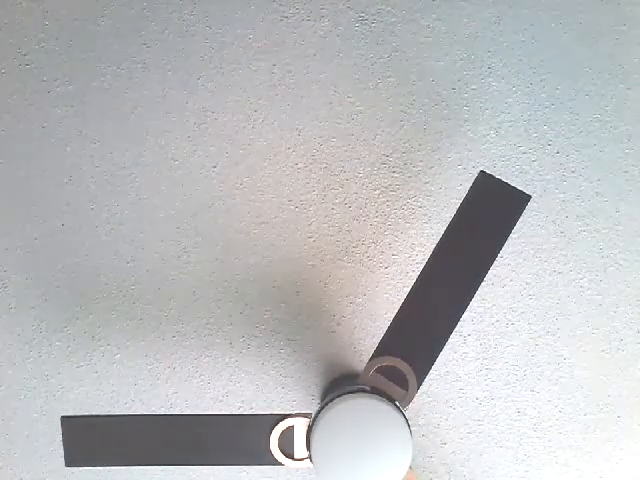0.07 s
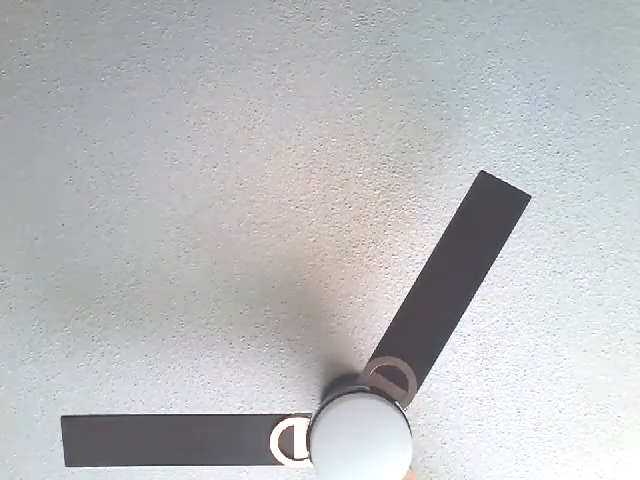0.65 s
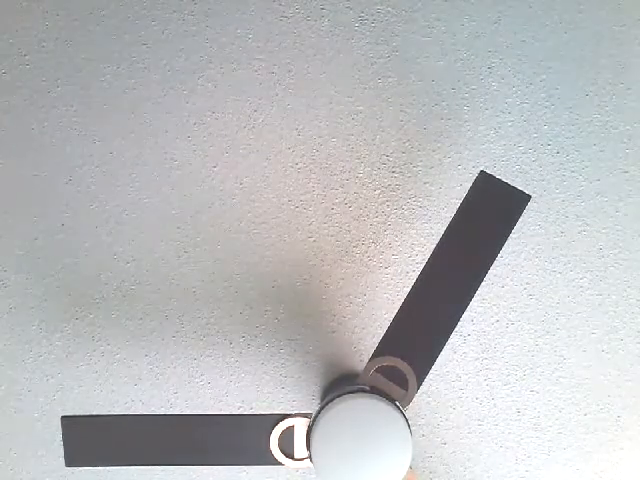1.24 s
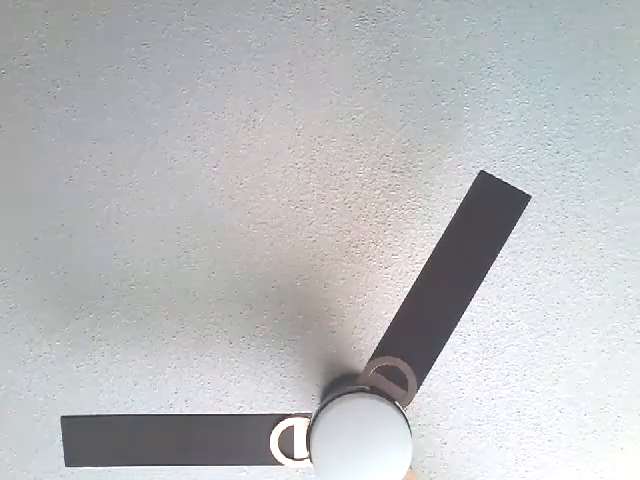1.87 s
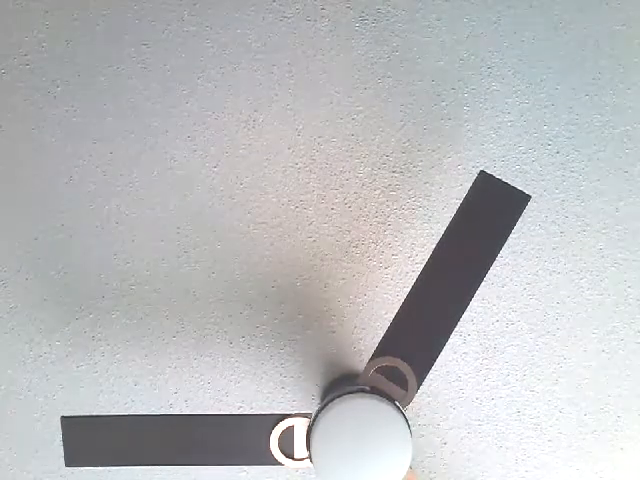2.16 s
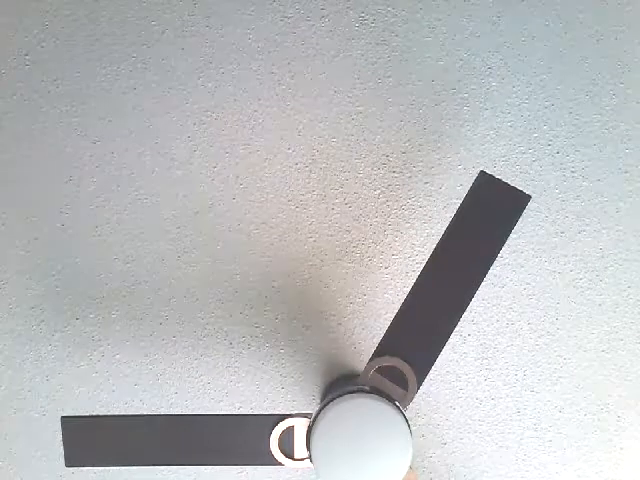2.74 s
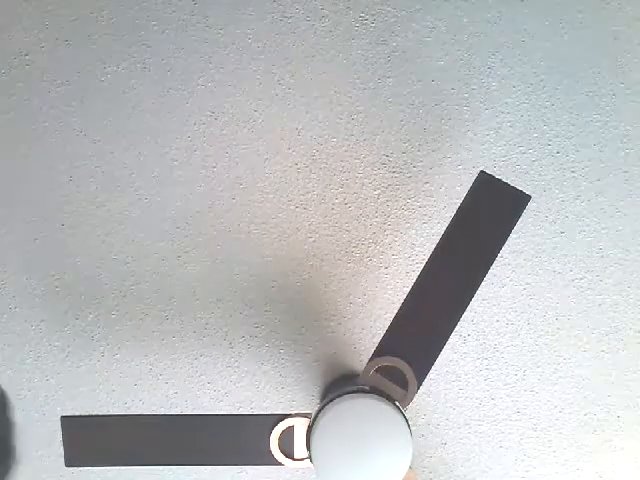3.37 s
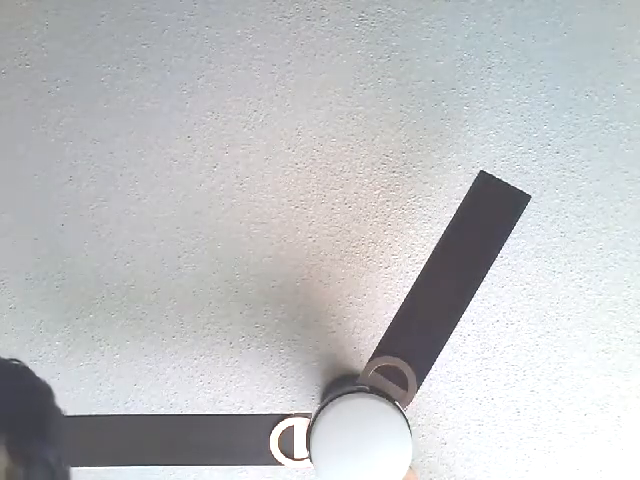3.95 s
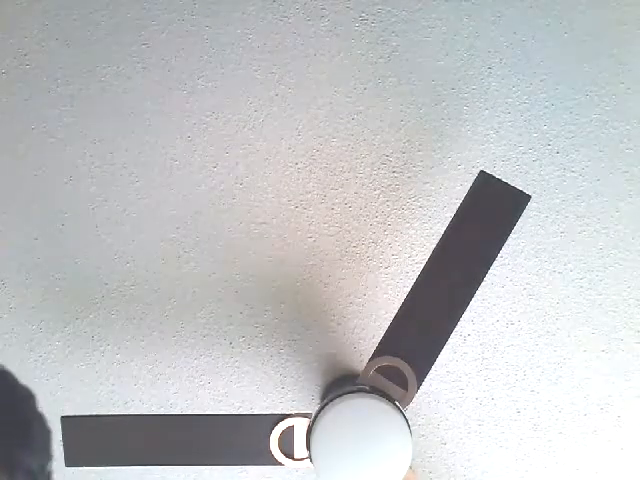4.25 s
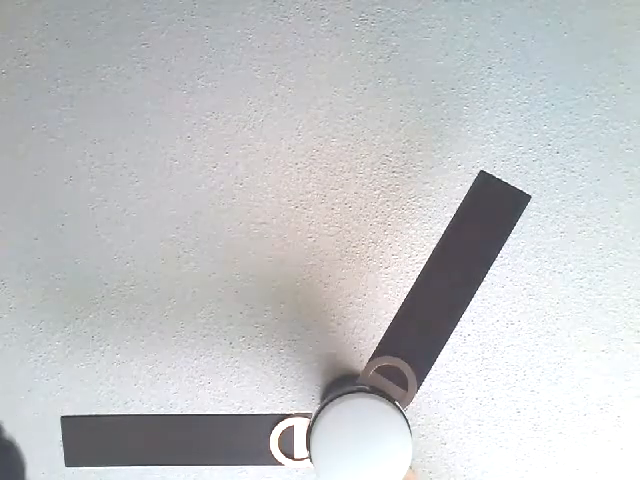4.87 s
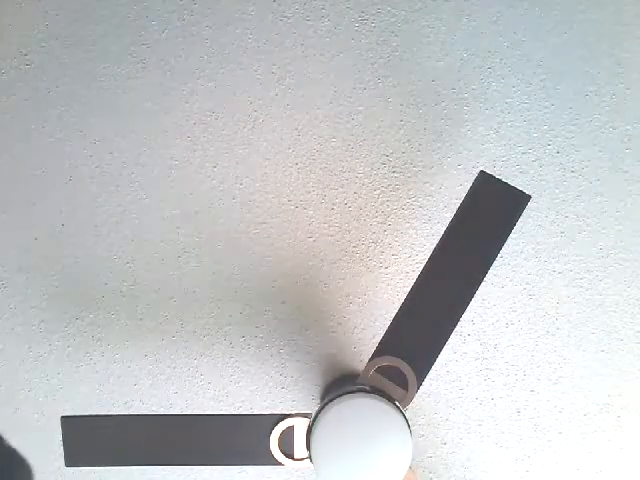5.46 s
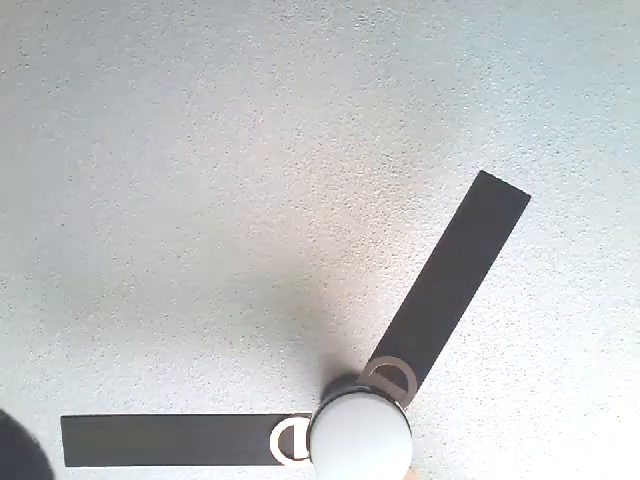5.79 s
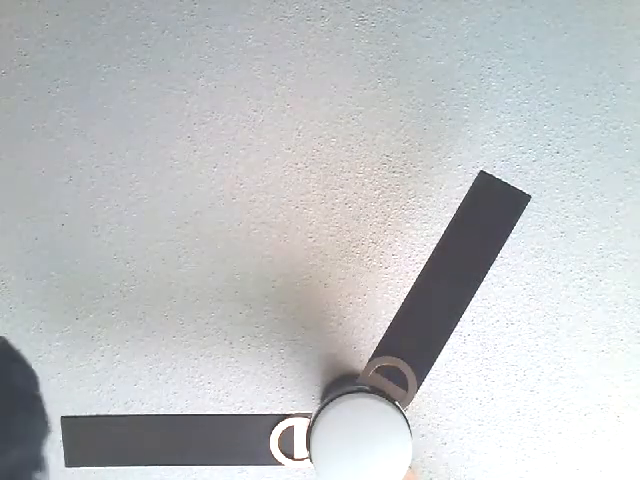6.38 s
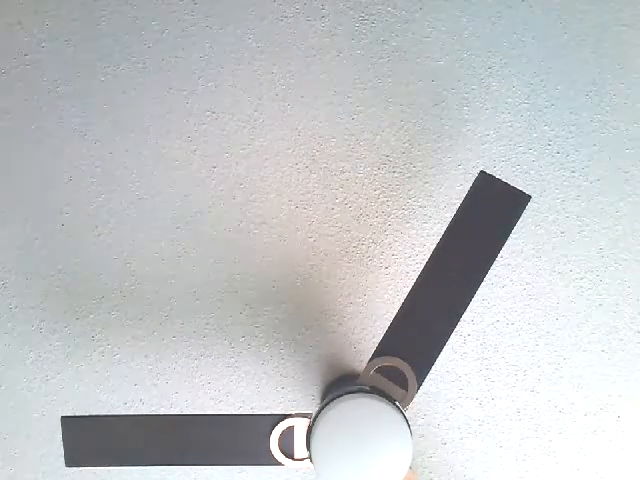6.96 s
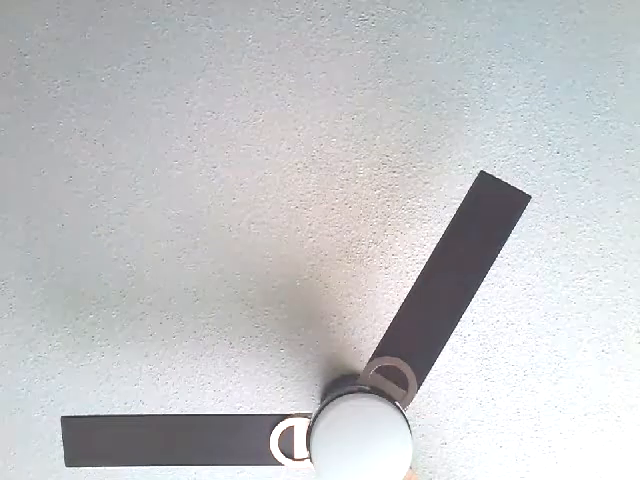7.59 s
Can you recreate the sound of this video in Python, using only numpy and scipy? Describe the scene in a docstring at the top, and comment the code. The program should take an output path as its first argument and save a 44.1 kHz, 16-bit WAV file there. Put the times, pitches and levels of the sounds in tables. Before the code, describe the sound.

Someone moves about near the microphone, shifting things with a run of clicks, dull bumps and swishing cloth. Wood then ticks and creaks softly under weight. A few clunks lead to a sharp bang, like a wooden door closing, and the snap of its latch, both ringing briefly in the small room. Light rustles and taps finish, with faint hiss and electrical hum underneath.

```python
"""A small hard-walled room: someone moves about close to the microphone, shifting things.
Fabric rustles as fibres catch and let go, and briefly whistles. Objects bump, click and knock;
wood ticks and creaks under weight. Each contact is a short pulse or a set of ringing modes.
Then a wooden panel, probably a door, clunks, bangs into its frame, and its catch snaps home.
Faint hiss and mains hum lie underneath."""
import sys
import numpy as np
from scipy import signal
from scipy.fft import rfft, irfft
from scipy.io import wavfile

SR = 44100
rng = np.random.default_rng(int(sys.argv[2]) if len(sys.argv) > 2 else 0)


def pcm_store(signal):
    """Save signal as 16-bit PCM."""
    levels = np.round(np.clip(np.atleast_2d(signal), -1, 1) * 32767)
    wavfile.write(sys.argv[1], SR, levels.astype(np.int16).T)


N = 336483

# Room decay: freq_hz, t60_s
ROOM_DECAY = [(120, 0.55), (300, 0.42), (700, 0.45), (1500, 0.52), (3000, 0.43), (7000, 0.55),
              (14000, 0.49)]
# Noise spectra: freq_hz, gain_db
HISS_SPECTRUM = [(25, -3.5), (60, -5.5), (110, 9.5), (150, -0.5), (210, -5.5), (300, -1.5), (500, -7.5),
                 (1200, -12), (4200, -14.5), (5400, -13.5), (6400, -5.5), (7800, -18.5), (10000, -18.5),
                 (14500, -16.5)]
SWISH_SPECTRUM = [(1500, -17), (3000, -12.5), (4500, -7.5), (5600, -2.5), (6700, -1), (8000, -7.5),
                  (10000, -13.5), (12000, -18), (14500, -62)]
SCRAPE_SPECTRUM = [(200, -15), (420, -1), (540, -1.5), (700, -0.5), (1000, -2.5), (1450, 1), (1850, -2.5),
                   (2600, -3), (3400, -2), (4500, -6), (7000, -11.5), (12000, -52)]
SHUDDER_SPECTRUM = [(30, -3.5), (70, -5.5), (100, 5), (125, -5), (162, -3), (220, -8), (330, -3),
                    (460, -15), (530, -3), (750, -10), (1500, -43)]
# Fabric strokes: fastest_s, rise_s, fade_s, swish_db, scrape_re_swish_db
FABRIC_STROKES = [(0.015, 0.066, .19, -55.5, -8.5), (0.25, 0.15, 0.35, -53.5, -2.5),
                  (0.44, 0.11, 0.18, -44.5, 2), (0.75, 0.19, .3, -47.5, -2), (0.89, 0.17, .35, -42, 2),
                  (1.03, 0.1, 0.19, -34.5, -1.5), (1.10, 0.064, 0.2, -35, -4), (1.32, 0.25, 0.36, -46, 4.5),
                  (1.58, 0.058, 0.16, -45, 1), (1.685, 0.033, 0.1, -42.5, -5.5),
                  (1.87, 0.074, 0.44, -47.5, 4), (2.02, 0.14, 0.29, -46, -0.5),
                  (2.30, 0.14, 0.25, -54.5, -6.5), (2.79, .12, 0.27, -56.5, -5),
                  (2.95, .08, 0.34, -55.5, -9), (3.19, 0.084, 0.21, -48.5, -12.5),
                  (3.53, 0.18, 0.24, -60.5, -4.5), (3.75, 0.12, .25, -62, -6),
                  (3.889, 0.034, 0.28, -45.5, -18), (4.24, 0.042, 0.18, -59.5, -12),
                  (4.44, 0.14, 0.26, -62.5, -11), (4.70, 0.028, 0.21, -49, -3), (4.89, 0.18, 0.31, -53, -3),
                  (5.2, 0.15, .16, -50.5, 1.5), (5.62, 0.26, 1, -52.5, -4.5),
                  (6.48, 0.097, 0.32, -59.5, -5), (6.74, 0.21, 1, -56.5, -1.5), (7.01, 0.14, 0.4, -51, -1),
                  (7.25, 0.16, 0.75, -52, -7)]
# Contact pulse spectra: freq_hz, gain_db
BUMP_SPECTRUM = [(40, -44), (100, -14), (170, 5), (330, -1), (600, 1), (850, -3), (1300, -23.5),
                 (2500, -22), (6000, -32.5), (14000, -58)]
FAR_KNOCK_SPECTRUM = [(60, -39), (170, -14), (245, -1), (370, -7.5), (460, -1.5), (640, -5.5), (800, -14.5),
                      (1500, -24), (5000, -32.5), (14000, -50)]
CLICK_SPECTRUM = [(40, -22), (110, 1.5), (160, 11), (230, 0.5), (400, -0.5), (540, 4), (1000, -5.5),
                  (2500, -2), (4500, -6), (6800, -5), (9000, -17.5), (14000, -42)]
SNAP_SPECTRUM = [(100, -32), (3000, -24), (6000, 3), (7700, -4), (10000, -10), (14000, -16)]
TICK_SPECTRUM = [(60, -5), (200, 4.5), (500, 6), (1100, 5), (2300, 5.5), (3500, -8), (7000, -3),
                 (14000, -33)]
SLIP_SPECTRUM = [(80, -27.5), (250, -3), (450, -1.5), (700, -4), (1100, -8.5), (2000, -10), (2800, -6.5),
                 (4000, -28), (12000, -36)]
CLUNK_SPECTRUM = [(40, -33.5), (90, -18), (140, -1.5), (190, 2.5), (280, -1.5), (380, -2.5), (470, -6),
                  (580, -2.5), (720, -7), (950, -12), (1400, -19), (2500, -26), (6000, -30), (14000, -64)]
CRACK_SPECTRUM = [(200, -21.5), (1500, -8), (6000, 1.5), (9000, -11), (14000, -20.5)]
PANEL_SPECTRUM = [(40, -38), (110, -20), (250, -8), (350, -5.5), (430, -2), (600, -11), (830, -12),
                  (1200, -26), (2000, -22), (3400, -27), (4600, -30), (6500, -27), (9000, -35.5),
                  (14000, -57)]
CATCH_SPECTRUM = [(40, -34.5), (130, -16.5), (240, -2), (420, -2), (570, -10), (720, -9), (880, -3.5),
                  (1300, -17), (2800, -20.5), (4300, -25), (6200, -24), (8000, -31.5), (10500, -42.5),
                  (14000, -62.5)]
# Dull contacts: start_s, level_db, pitch_hz, treble_tilt_db_per_octave
OBJECT_BUMPS = [(0.158, -35, 346, 3), (0.228, -35.5, 140, 3), (0.391, -39, 208, 2.5), (1.127, -37, 180, 5),
                (1.161, -35, 214, 1.5), (1.286, -32, 164, -8), (1.342, -31.5, 165, 1),
                (1.936, -37, 520, -13), (2.047, -25.5, 182, 4.5), (3.978, -40.5, 407, 3.5),
                (6.775, -42.5, 420, 5), (7.001, -29.5, 304, 7)]
DISTANT_KNOCKS = [(2.744, -50, 255, -18), (2.760, -37, 440, -4), (2.918, -31.5, 530, 1),
                  (2.940, -48, 580, 10)]
# Other contacts: start_s, level_db, pitch_hz
OBJECT_CLICKS = [(0.357, -22.5, 800), (1.076, -17, 353), (1.116, -11.5, 627), (1.240, -20, 579),
                 (1.284, -17.5, 301), (1.298, -20, 507), (1.317, -14, 436), (1.413, -23, 554),
                 (1.429, -11.5, 454), (1.569, -16, 566), (1.669, -14.5, 603), (1.676, -17, 2620),
                 (1.775, -14.5, 560), (1.783, -17.5, 545), (1.856, -14, 540), (1.936, -12.5, 516),
                 (1.982, -13.5, 570), (2.043, -16, 540), (2.099, -17.5, 525), (4.685, -27.5, 580),
                 (4.698, -20, 2330)]
FABRIC_SNAPS = [(0.552, -33, 7450), (0.6875, -29, 7850), (0.6975, -31, 7600), (1.414, -25, 7500),
                (4.6857, -23.5, 6960), (5.598, -22.5, 5500)]
WOOD_TICKS = [(3.227, -34, 713), (3.458, -41, 1180), (3.521, -42, 620), (3.533, -30.5, 1000),
              (3.843, -32.5, 724), (3.982, -31.5, 716), (4.303, -38, 1730), (4.317, -37, 778),
              (4.398, -37, 2110), (5.755, -24.5, 778), (5.807, -25.5, 764), (5.870, -29, 783),
              (6.946, -23, 890)]
WOOD_SLIPS = [(4.795, -38, 560), (4.812, -43, 616), (4.825, -31.5, 600), (4.855, -28, 530),
              (4.866, -25.5, 397), (4.889, -27.5, 522), (4.905, -32.5, 528), (5.041, -39, 490),
              (5.066, -33, 355), (5.094, -24.5, 460), (5.114, -35, 363), (5.124, -26, 470),
              (5.157, -26, 440), (5.186, -23.5, 404), (5.205, -26.5, 415)]
PANEL_CLUNKS = [(5.402, -13.5, 380), (5.415, -21.5, 544), (5.449, -27.5, 214), (5.510, -27.5, 185),
                (5.558, -15, 651), (5.586, -20.5, 552), (5.614, -22.5, 643), (5.713, -26.5, 121)]
# Blows on ringing parts: start_s, gain_db
BOX_HITS = [(0.16, -29), (0.173, -42), (1.019, -27)]
PANEL_HITS = [(5.9455, 2), (5.958, -9), (5.967, -17.5), (5.9775, -1), (5.9825, -5), (6.007, -7.5)]
CATCH_HITS = [(6.169, -1.5), (6.1718, 1), (6.181, -4.5)]
# Modes those blows excite: freq_hz, gain_db, t60_s
BOX_RING = [(113.8, -15.5, 0.74), (337, -4.5, 0.38), (337, -36, 0.26), (484, -4.5, 0.056),
            (521, -14.5, 0.56), (643, -5, 0.046), (1080, -19.5, 0.14), (1200, -28, 0.26)]
PANEL_RING = [(167, -19, .5), (214, -16, .5), (257, -4, .43), (319, -1, .36), (352, 5, .44), (431, -9, .5),
              (532, -11, .5), (635, -15, .4), (689, -16, .4), (827, -3, .35), (1066, -23, .44),
              (1561, -22, .3), (1949, -25, .36), (2055, -20, .44), (2584, -27, .35)]
CATCH_RING = [(237, -1, .5), (334, -2, .5), (474, -4, .45), (576, 0, .52), (646, -10, .55), (807, -9, .6),
              (879, 1, .34), (965, -6, .3), (1066, -14, .45), (1140, -10, .32), (1320, -11, .42),
              (1933, -17, .37), (2143, -19, .4), (2778, -16, .26)]

PULSE_SAMPLES = 2048
PULSE_GRID_HZ = np.linspace(1, SR / 2, PULSE_SAMPLES + 1)


def gain_of(db):
    """Decibels to amplitude."""
    return 10 ** (np.asarray(db) / 20)


def unit_rms(x):
    """Scales to rms 1."""
    return x / np.sqrt(np.mean(x ** 2) + 1e-20)


def curve_at(points, hz):
    """Interpolates (freq_hz, value) points over log frequency."""
    points_hz, values = np.transpose(points)
    return np.interp(np.log(hz + 1), np.log(points_hz + 1), values)


def add(mix, start_s, sound):
    """Mixes a sound in at start_s."""
    part = mix[max(round(start_s * SR), 0):][:len(sound)]
    part += sound[:len(part)]


def coloured(x, spectrum):
    """Filters x by a spectrum; rms 1."""
    gains = gain_of(curve_at(spectrum, np.fft.rfftfreq(len(x), 1 / SR)))
    return unit_rms(irfft(rfft(x) * gains, len(x)))


def wander(rate_hz):
    """Bounded random motion, rms 1."""
    knots = rng.uniform(-1, 1, N)
    return unit_rms(np.interp(np.arange(N) * rate_hz / SR, np.arange(N), knots))


def pulse(gain_db):
    """Minimum-phase pulse from gains on PULSE_GRID_HZ; peak 1."""
    log_gain = np.log(gain_of(np.r_[gain_db, gain_db[-2:0:-1]]))
    response = np.exp(np.conj(signal.hilbert(log_gain)))
    wave = np.fft.ifft(response).real[:PULSE_SAMPLES]
    return wave / abs(wave).max()


def gritty(wave, grit_s, split_hz=1300):
    """Rough faces meet in many tiny touches, smearing a pulse's treble."""
    low = signal.sosfilt(signal.butter(2, split_hz, fs=SR, output="sos"), wave)
    high = signal.sosfilt(signal.butter(2, split_hz, "high", fs=SR, output="sos"), wave)
    touches = rng.standard_normal(256) * np.exp(-np.arange(256) / SR / grit_s)
    return low + np.convolve(high, touches / np.linalg.norm(touches))[:len(wave)]


def room(wet_db, early_db, early_s):
    """Impulse response: direct sound, scatter off near surfaces, diffuse tail."""
    echoes_per_s, build_s = 4000, 0.0088
    t = np.arange(SR * 3 // 4) / SR
    echoes = rng.choice([-1., 1.], len(t)) * (rng.random(len(t)) < echoes_per_s / SR)
    hz, frame_s, frames = signal.stft(echoes, SR, nperseg=256)
    decay = gain_of(-60 * frame_s / curve_at(ROOM_DECAY, hz)[:, None])
    tail = signal.istft(frames * decay, SR, nperseg=256)[1][:len(t)]
    tail *= 1 - np.exp(-t / build_s)
    tail *= gain_of(wet_db) / np.linalg.norm(tail)
    early = rng.standard_normal(len(t)) ** 3 * np.exp(-t / early_s) * (t > .001)
    early *= gain_of(early_db) / np.linalg.norm(early)
    return (t == 0) + tail + early


def friction(spectrum, grains_per_s, spread_db, smooth, flutter_db):
    """Fibres catch and let go: uneven, clumped grains over smooth hiss, in the room; rms 1."""
    sizes = gain_of(spread_db * np.minimum(rng.exponential(1, N), 4)) * rng.choice([-1., 1.], N)
    grains = unit_rms(sizes * (rng.random(N) < grains_per_s / SR))
    drive = (grains + smooth * rng.standard_normal(N)) * gain_of(flutter_db * wander(rate_hz=76))
    heard = signal.fftconvolve(drive, room(wet_db=-6.5, early_db=-5.5, early_s=0.0067))[:N]
    return coloured(heard, spectrum)


def contacts(rows, spectrum, ring_db, ring_octaves, wet_db, early_db, tilt_db_per_octave=0):
    """Each contact is a short pulse with one resonance, set by where it lands."""
    out = np.zeros(N)
    for start_s, level_db, pitch_hz, *own_tilt in rows:
        resonance_db = ring_db / (1 + (np.log2(PULSE_GRID_HZ / pitch_hz) / ring_octaves) ** 2)
        treble_db = (tilt_db_per_octave + sum(own_tilt)) * np.log2(1 + PULSE_GRID_HZ / 1000)
        wave = pulse(curve_at(spectrum, PULSE_GRID_HZ) + resonance_db + treble_db)
        heard = signal.fftconvolve(gritty(wave, grit_s=0.00084), room(wet_db, early_db, early_s=0.015))
        add(out, start_s, gain_of(level_db) * heard)
    return out


def bang(hits, spectrum, modes, hit_db, ring_db, wet_db, swell_s):
    """Clustered blows sound in the room; from the first, the modes swell and ring out."""
    out, t = np.zeros(N), np.arange(SR) / SR
    wave = pulse(curve_at(spectrum, PULSE_GRID_HZ))
    for start_s, gain_db in hits:
        heard = signal.fftconvolve(wave, room(wet_db, early_db=3, early_s=0.0078))
        add(out, start_s, gain_of(gain_db + hit_db) * heard)
    ring = sum(gain_of(db - 60 * t / t60_s) * np.sin(2 * np.pi * (hz * t + rng.random()))
               for hz, db, t60_s in modes)
    add(out, hits[0][0], gain_of(ring_db) * ring * (1 - np.exp(-t / swell_s)))
    return out


def background():
    """Steady hiss and a faint, wavering mains hum."""
    hiss_db, hum_db, hum_hz = -63, -78, 100
    hum = np.sqrt(2) * np.sin(2 * np.pi * hum_hz * np.arange(N) / SR + .55 * wander(rate_hz=16))
    hiss = coloured(rng.standard_normal(N), HISS_SPECTRUM)
    return gain_of(hiss_db) * hiss + gain_of(hum_db) * hum


def cloth_whistle():
    """Ribs of the weave pass each other at an uneven rate that climbs as the slide speeds up."""
    start_s, rise_s, level_db, fade_db_per_s = 6.68, 0.017, -53.5, 200
    from_hz, to_hz, glide_s = 10000, 11600, .033
    t = np.maximum(np.arange(N) / SR - start_s, 0)
    pitch_hz = to_hz + (from_hz - to_hz) * np.exp(-t / glide_s)
    cycles = np.cumsum(pitch_hz * (1 + .04 * wander(rate_hz=2500))) / SR
    fade_db = fade_db_per_s * np.maximum(t - rise_s, 0)
    return np.minimum(t / rise_s, 1) ** 2 * gain_of(level_db - fade_db) * np.sin(2 * np.pi * cycles)


def stroke_envelopes():
    """Swish and scrape amplitudes: strokes gather speed and run out; overlaps add in power."""
    end_db, rise_exponent, fade_exponent = -24, 2.19, 1.14
    t = np.arange(0, N / SR, .002)
    swish_power, scrape_power = np.zeros((2, len(t)))
    for fastest_s, rise_s, fade_s, swish_db, scrape_re_swish_db in FABRIC_STROKES:
        before = (np.maximum(fastest_s - t, 0) / rise_s) ** rise_exponent
        after = (np.maximum(t - fastest_s, 0) / fade_s) ** fade_exponent
        swish = gain_of(swish_db + end_db * (before + after))
        swish_power += swish ** 2
        scrape_power += (swish * gain_of(scrape_re_swish_db)) ** 2
    return [np.interp(np.arange(N) / SR, t, np.sqrt(power)) for power in (swish_power, scrape_power)]


def rustle():
    """Light sliding swishes, firm rubbing scrapes, and the moved things shudder with the scrape."""
    firm_scrape_db, firm_shudder_db, shudder_db_per_db = -43, -51.5, 0.63
    swish, scrape = stroke_envelopes()
    shudder = gain_of(firm_shudder_db) * (scrape / gain_of(firm_scrape_db)) ** shudder_db_per_db
    out = swish * friction(SWISH_SPECTRUM, grains_per_s=5000, spread_db=4.5, smooth=0.77, flutter_db=1)
    out += scrape * friction(SCRAPE_SPECTRUM, grains_per_s=1500, spread_db=3, smooth=0.67, flutter_db=2)
    out += shudder * friction(SHUDDER_SPECTRUM, grains_per_s=300, spread_db=3, smooth=.5, flutter_db=4)
    return out


def box_knocks():
    """A hollow object rings on a few low modes at each knock."""
    attack_s = 0.00042
    out, t = np.zeros(N), np.arange(SR) / SR
    ring = sum(gain_of(db - 60 * t / t60_s) * np.cos(2 * np.pi * hz * t) for hz, db, t60_s in BOX_RING)
    ring *= 1 - np.exp(-t / attack_s)
    for start_s, gain_db in BOX_HITS:
        add(out, start_s, gain_of(gain_db) * ring)
    return out


def handling():
    """Things are set down, knock farther off and click together; fabric gives tiny bright snaps."""
    bumps = contacts(OBJECT_BUMPS, BUMP_SPECTRUM,
                     ring_db=12.5, ring_octaves=0.096, wet_db=2.5, early_db=-2.5)
    knocks = contacts(DISTANT_KNOCKS, FAR_KNOCK_SPECTRUM,
                      ring_db=3.5, ring_octaves=0.28, wet_db=4, early_db=-3)
    clicks = contacts(OBJECT_CLICKS, CLICK_SPECTRUM,
                      ring_db=7, ring_octaves=.3, wet_db=-2, early_db=-2.5, tilt_db_per_octave=.5)
    snaps = contacts(FABRIC_SNAPS, SNAP_SPECTRUM, ring_db=10, ring_octaves=.2, wet_db=-8, early_db=-7)
    return bumps + knocks + clicks + snaps


def wood_creaks():
    """Wood ticks as it takes weight and creaks in slow slips."""
    ticks = contacts(WOOD_TICKS, TICK_SPECTRUM,
                     ring_db=6.5, ring_octaves=0.39, wet_db=-5.5, early_db=-1.5)
    slips = contacts(WOOD_SLIPS, SLIP_SPECTRUM, ring_db=8.5, ring_octaves=0.3, wet_db=-4, early_db=-4.5)
    return ticks + slips


def edge_crack(start_s, level_db):
    """Hard edges meet: a bright, dry snap ahead of the room's answer."""
    out = np.zeros(N)
    wave = gritty(pulse(curve_at(CRACK_SPECTRUM, PULSE_GRID_HZ)), grit_s=0.0023)
    add(out, start_s, gain_of(level_db) * wave)
    return out


def panel():
    """The panel clunks when handled, bangs and chatters in its frame; then the catch snaps home."""
    clunks = contacts(PANEL_CLUNKS, CLUNK_SPECTRUM,
                      ring_db=10, ring_octaves=.2, wet_db=-0.5, early_db=-2, tilt_db_per_octave=-0.8)
    slam = bang(PANEL_HITS, PANEL_SPECTRUM, PANEL_RING,
                hit_db=-4, ring_db=-11.5, wet_db=7, swell_s=0.0027)
    catch = bang(CATCH_HITS, CATCH_SPECTRUM, CATCH_RING,
                 hit_db=-5, ring_db=-21, wet_db=5.5, swell_s=0.0023)
    cracks = edge_crack(PANEL_HITS[0][0], level_db=-9.5) + edge_crack(CATCH_HITS[1][0], level_db=-10)
    return clunks + slam + catch + cracks


def scene():
    """All sources at one microphone."""
    mix = background() + rustle() + box_knocks() + cloth_whistle() + handling() + wood_creaks() + panel()
    return mix[None]


def record(dry):
    """Overload rounds the loudest peaks; the recorder drops deep bass and top treble."""
    ceiling, low_cut_hz, high_cut_hz = .85, 70, 14800
    rounded = dry / (1 + (dry / ceiling) ** 6) ** (1 / 6)
    thinned = signal.sosfilt(signal.butter(2, low_cut_hz, "high", fs=SR, output="sos"), rounded)
    lowpass = signal.firwin(511, high_cut_hz, window=("kaiser", 9), fs=SR)
    return signal.oaconvolve(thinned, lowpass[None], "same")


dry = scene()
out = record(dry)
pcm_store(out)
```